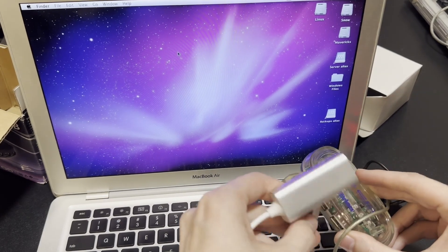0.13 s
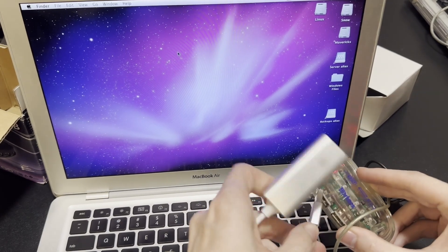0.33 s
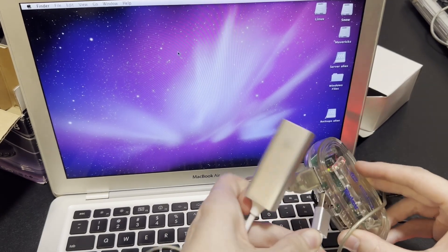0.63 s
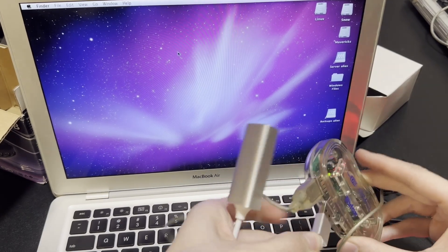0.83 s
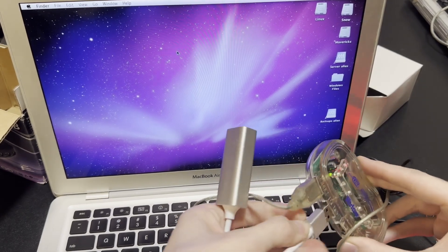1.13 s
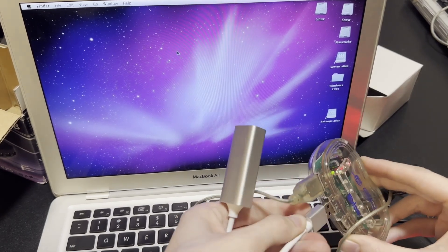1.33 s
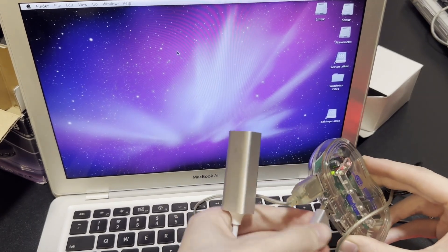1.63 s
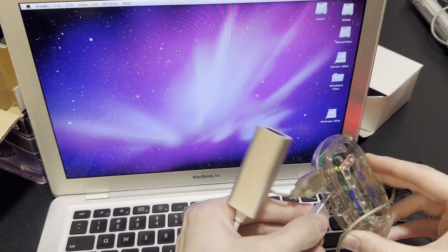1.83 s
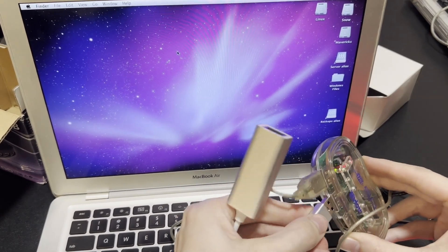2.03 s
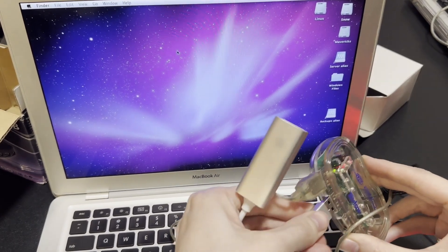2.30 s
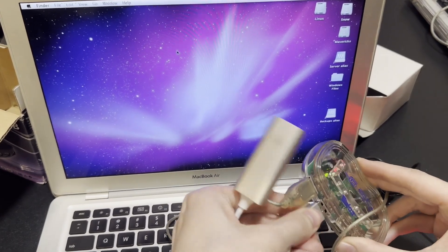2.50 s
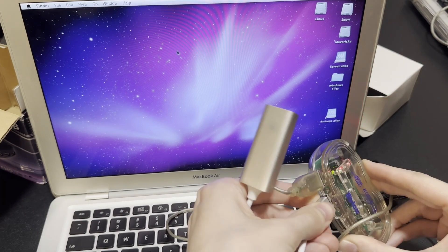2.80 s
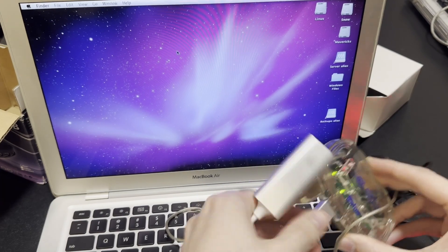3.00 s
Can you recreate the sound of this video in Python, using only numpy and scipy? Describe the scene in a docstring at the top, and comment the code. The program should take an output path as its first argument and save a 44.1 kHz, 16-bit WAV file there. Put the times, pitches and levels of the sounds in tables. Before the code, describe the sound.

Sharp bouncing taps of a metal adapter on a hollow plastic hub, then small clustered plug clicks with faint ticks and sliding, close stereo microphone in a small room with low rumble.

```python
"""A small room with a low rumble, a faint hum and hiss; a hollow plastic hub is close to the stereo microphone.
A metal USB adapter is fitted to its port: the case taps the hub and bounces, then the plug catches several times.
Each contact is a noise-like force that excites the hub's damped modes; thin metal adds decaying sines.
Between them the parts tick, and slide with grainy filtered noise. The hub thuds softly in the hand.
The room answers the knocks with decaying noise, coloured and timed band by band."""
import sys
import numpy as np
from scipy import signal
from scipy.fft import rfft, irfft
from scipy.io import wavfile
from scipy.ndimage import uniform_filter1d

SR = 44100
rng = np.random.default_rng(int(sys.argv[2]) if len(sys.argv) > 2 else 0)


def master(y):
    """Save y as 16-bit WAV."""
    cut = np.clip(np.atleast_2d(y).T, -1, 1)
    pcm = np.round(cut * 32767)  # scale
    wavfile.write(sys.argv[1], SR, pcm.astype(np.int16))


N = 138915

# Edges of six adjoining bands, in order body, shell, clack, snap, edge, sizzle: f/Hz
BAND_EDGES_HZ = [300, 1450, 2200, 3200, 7000, 10600, 16500]
# Placing and distance of each band: delay/s, side level re mid/dB, left minus right/dB,
# room level re knock/dB, room t60/s
BAND_PLACING = [(0.0013, -9, -0.5, -10, 0.47), (0.00061, -6, -5, -9, 0.41), (0.0011, -11, 0, -11.5, .42),
                (0.0019, -1, 3, -10.5, 0.41), (0.00054, 1, 2, -16.5, 0.41), (0.0013, -7.5, -0.5, -17, 0.32)]

# Room rumble, spectral shape: f/Hz, relative level per Hz/dB
RUMBLE_COLOUR = [(22, -25.5), (36, -3), (55, 1), (75, -1), (100, -2), (130, -5.5), (180, -11.5), (230, -10),
                 (300, -18), (450, -24.5), (700, -30), (1200, -34), (1500, -39), (1900, -37.5), (3000, -46),
                 (6000, -52)]
# Microphone hiss, spectral shape: f/Hz, relative level per Hz/dB
HISS_COLOUR = [(300, 7.5), (1200, 6.5), (2500, -6.5), (4000, -5.5), (5700, -7.5), (6700, 7.5), (7600, 5),
               (8500, -11.5), (9750, -8.5), (10100, -0.5), (10450, -17.5), (13000, -17), (16000, -19.5)]
RUMBLE_DB, RUMBLE_SIDE_DB = -57.5, -15  # rms level, side level re mid
HISS_DB, HISS_SIDE_DB = -70, 0.5
HUM_HZ, HUM_DB = 99.3, -68

# Soft thuds of the hub in the hand: t/s, f/Hz, peak level/dB, swell/s
THUDS = [(.031, 230.4, -49, .003), (1.535, 153.5, -57.5, 0.019), (1.545, 219.6, -57.5, 0.01),
         (2.605, 155, -45, .006), (2.607, 372, -47, 0.005)]

# Adapter's case bouncing on the hub: t/s, contact length/s, level in each of the six bands/dB
CASE_TAPS = [(0.032, 0.00096, -43.5, -44, -33, -27, -23, -28),
             (0.0514, 0.0012, -47, -50, -42, -32.5, -34.5, -31.5),
             (0.0836, 0.0021, -47.5, -37.5, -41, -42.5, -39, -44.5)]
# Catches of the plug: t/s, scrape length/s, favoured hub resonance f/Hz, sleeve ring level/dB,
# level in each of the six bands/dB
PLUG_CATCHES = [(0.9538, 0.0044, 956, -10, -53, -45, -45.5, -54, -43.5, -59.5),
                (0.9603, 0.00073, 951, -4, -54.5, -42.5, -38, -45, -34.5, -43.5),
                (0.964, 0.002, 781, 1, -37, -42, -46.5, -37.5, -36.5, -44.5),
                (0.9688, 0.002, 720, -4, -39.5, -44, -47.5, -44, -46, -51),
                (1.453, 0.0014, 1090, -11.5, -43, -41, -50.5, -50, -52, -54),
                (1.8958, 0.0014, 478.5, -14, -40, -34.5, -36.5, -38, -33, -48),
                (2.0828, 0.0022, 1080, 0.5, -37.5, -45, -42, -46, -39, -40.5),
                (2.0865, 0.0027, 601, 3, -45.5, -47.5, -48, -40, -44.5, -48.5),
                (2.6055, 0.0014, 1099, -14, -47.5, -42.5, -50, -53.5, -48.5, -50),
                (2.608, 0.002, 1150, -14, -40.5, -43, -50.5, -50, -51, -55.5),
                (2.6128, 0.0017, 380, -14, -53.5, -54, -57.5, -54, -54.5, -52.5)]
# Light touches of the parts: t/s, level in each of the six bands before TICK_DB/dB
TICKS = [(0.1407, -54, -53.5, -52.5, -80, -62, -67), (0.2307, -53, -53, -60, -63, -62, -64.5),
         (0.3604, -51.5, -54, -57, -65, -84, -77), (0.6545, -54.5, -62.5, -60, -62, -51.5, -58),
         (0.767, -69, -60.5, -77, -71, -80, -82.5), (0.783, -70, -72, -71, -60, -67, -78),
         (0.8823, -59, -75, -79.5, -58.5, -58, -75), (1.0857, -69, -61, -73.5, -72, -78, -83.5),
         (1.1082, -68, -72, -83, -66.5, -62.5, -69), (1.1924, -78, -65.5, -81.5, -74.5, -79, -93),
         (1.3121, -80, -85, -79, -65.5, -81.5, -92.5), (1.3378, -65.5, -71, -68, -58.5, -82, -100.5),
         (1.3495, -70, -72, -70, -59.5, -69.5, -85), (1.4102, -61.5, -58.5, -72, -71, -70, -80),
         (1.4253, -59.5, -59.5, -70, -70, -83, -88), (1.6944, -61, -64.5, -66.5, -85, -67.5, -78.5),
         (1.955, -58, -58, -57, -57.5, -84, -67), (2.2681, -74.5, -83, -67.5, -60.5, -59, -64.5),
         (2.451, -90, -95, -91.5, -79, -66.5, -58.5), (2.5034, -62.5, -65.5, -70, -68.5, -61.5, -66),
         (2.5476, -75, -71, -84, -63, -61, -75), (2.5596, -78, -57, -64.5, -72, -75, -76),
         (2.8245, -81.5, -95, -94.5, -72.5, -79, -78), (3.0511, -61.5, -70, -76, -64.5, -65, -64)]
TICK_DB, TICK_LENGTH_S = -2, .0007
# Damped modes of the hub: f/Hz, relative level before the favoured spot/dB, t60/s
HUB_MODES = [(510, -6.5, .016), (727, -5, .02), (921, -4.5, .02), (1062, -1.5, 0.019), (1213, -4, 0.013),
             (1750, 2, 0.015), (1957, 4, 0.022), (2360, -3, .012), (2734, 0.5, 0.011), (3400, -1, .009),
             (4023, 0, 0.005), (4893, 1.5, .012), (5854, -1.5, 0.0082), (6760, 1, 0.009),
             (7420, 0.5, 0.0047), (9170, 6, .005), (10010, 7.5, 0.0063), (11850, -3, .003),
             (14200, -2.5, 0.002)]
# The spot that is struck favours the modes near one pitch; taps and ticks share theirs
LIGHT_KNOCK_HZ, FAVOUR_DB, FAVOUR_OCTAVES = 1050, 6.5, 0.38
LEAD_S = .004  # room for the force to build up before the contact time
SCRAPE_RISE_S, SCRAPE_RELEASE_S = 0.00069, 0.00067  # time constants; the rise lengthens with the scrape
CHATTER_DB, CHATTER_S = -15, 0.0039  # slower tail of the release

# Lasting ring of the adapter's case: f/Hz, level re the blow in that band before RING_DB/dB, t60/s
CASE_MODES = [(2000, -18.5, .3), (2600, -24.5, .3), (2740, -28, .45), (5050, -22.5, 0.4),
              (5180, -24.5, 0.38), (5220, -22, .38), (6700, -25, .37), (6870, -23.5, 0.35),
              (8130, -30, 0.16), (10250, -31, .22), (13020, -16.5, .23)]
# Lasting ring of the plug's sleeve: f/Hz, level re the blow before sleeve ring level and RING_DB/dB, t60/s
SLEEVE_MODES = [(1830, -18, .4), (2020, -30, 0.15), (2870, -27, 0.31), (4800, -20, .28),
                (4500, -24.5, 0.41), (5040, -18, .33)]
RING_DB = 0.5

# Colour of the room's echo: f/Hz, relative level/dB
ROOM_COLOUR = [(300, -0.5), (750, -1), (1100, -2), (1330, 3.5), (1510, 3.5), (1750, 3), (2000, -2.5),
               (2750, -2), (3300, -3), (4200, -4.5), (5000, 0), (6000, -7), (7500, 1.5), (10100, -1.5),
               (11200, -3), (14000, -4), (16000, -11)]
ROOM_ONSET_S, EARLY_DB, EARLY_S = 0.00667, 2, .014

# Fingers and plug sliding on the plastic: t/s, length/s, level in each of the six bands before SLIDE_DB/dB
SLIDES = [(0.267, 0.14, -70, -77, -76, -73.5, -69, -66), (0.504, 0.097, -70, -76, -72, -94, -84.5, -85.5),
          (0.583, 0.14, -63.5, -69.5, -67.5, -77.5, -73.5, -75),
          (0.704, 0.17, -69, -75.5, -71.5, -69, -66.5, -71.5),
          (0.816, 0.17, -67.5, -74, -77, -65.5, -63.5, -66),
          (1.725, 0.13, -69.5, -74, -81, -80, -76.5, -87), (1.792, 0.18, -78, -79, -82, -82, -66, -83),
          (2.295, 0.12, -74, -79.5, -89, -83, -78, -82.5), (2.465, 0.21, -68, -70, -76.5, -72.5, -75, -76),
          (2.625, 0.18, -68, -72, -84.5, -89, -91, -97), (2.905, 0.22, -70.5, -77.5, -80, -78, -79, -80.5),
          (3.006, 0.16, -67, -74.5, -81, -74.5, -76, -73.5)]
# Colour of rubbing: f/Hz, relative level/dB
RUB_COLOUR = [(300, -7), (750, -7.5), (1250, 3), (1510, 2.5), (1800, 11), (2750, -3.5), (3200, -2),
              (5000, -4), (6500, 0), (8500, -1), (9700, -0.5), (10400, 5), (11200, -9.5), (12500, -12),
              (14000, -6), (16000, -13)]
SLIDE_DB, SLIDE_GRAIN, SLIDE_WAVER_DB = -3.5, 0.24, 2.36  # grain is the rms of the log gain

TOP_HZ = 15600


def undb(db):
    """Decibels to gain."""
    return 10 ** (np.asarray(db) / 20)


def unit(x):
    """Scale to an energy of one."""
    return x / np.sqrt(np.sum(x ** 2) + 1e-18)


def level(x, db):
    """Scale to an rms level."""
    return x * undb(db) / np.sqrt(np.mean(x ** 2))


def add(out, x, s):
    """Mix a sound in, starting at s seconds."""
    i = max(int(s * SR), 0)
    out[:, i:i + x.shape[1]] += x[:, :max(N - i, 0)]


def band(x, k):
    """Keep one of the six bands; neighbours cross over without a gap."""
    size = 2 * x.shape[-1]
    f = np.fft.rfftfreq(size, 1 / SR) + 1
    low, high = BAND_EDGES_HZ[k:k + 2]
    gain = 1 / (1 + (low / f) ** 20) / (1 + (f / high) ** 20)
    return irfft(rfft(x, size) * gain, size)[..., :x.shape[-1]]


def noise(colour, size):
    """Two unrelated noises whose spectrum follows (f/Hz, level/dB) points."""
    hz, db = np.array(colour).T
    f = np.maximum(np.fft.rfftfreq(size, 1 / SR), 1)
    gain = undb(np.interp(np.log(f), np.log(hz), db))
    return irfft(rfft(rng.standard_normal((2, size))) * gain, size)


def stereo(pair, side_db, pan_db=0):
    """Mid and side to left and right."""
    sign = np.array([[1], [-1]])
    mid, side = unit(pair[0]), undb(side_db) * unit(pair[1])
    return (mid + side * sign) * undb(pan_db * sign / 2)


def fade(t, t60):
    """Exponential decay by 60 dB in t60."""
    return np.exp(-np.log(1000) * t / t60)


def background():
    """Steady coloured noise for room rumble and microphone hiss, with a faint sine hum."""
    rumble = level(stereo(noise(RUMBLE_COLOUR, N), RUMBLE_SIDE_DB), RUMBLE_DB)
    hiss = level(stereo(noise(HISS_COLOUR, N), HISS_SIDE_DB), HISS_DB)
    hum = level(np.sin(2 * np.pi * HUM_HZ * np.arange(N) / SR), HUM_DB)
    return rumble + hiss + hum


def thuds():
    """The hub gives in the hand: a low sine pulse swells and dies away, dead centre."""
    out = np.zeros((2, N))
    t = np.arange(SR // 5) / SR
    for s, hz, db, swell in THUDS:
        envelope = t / swell * np.exp(1 - t / swell)
        pulse = undb(db) * envelope * np.sin(2 * np.pi * hz * t)
        add(out, pulse[None], s)
    return out


def burst(shape):
    """Two random forces that follow an envelope and have a nearly even spectrum."""
    force = rng.standard_normal((2, len(shape))) * shape
    for _ in range(3):
        # flatten the spectrum, then restore the envelope
        force = irfft(np.exp(1j * np.angle(rfft(force))), len(shape))
        power = np.abs(uniform_filter1d(force ** 2, size=24))
        force = force * shape / np.sqrt(power + 1e-18)
    return force


def contact(length, levels, knock_hz):
    """A short scrape builds up, lets go and chatters, knocking the hub's modes; one stereo sound per band."""
    t = np.arange(2400) / SR
    since = t - LEAD_S
    grip = np.exp(np.minimum(since - length / 2, 0) / (SCRAPE_RISE_S + length / 10))
    after = np.maximum(since - length, 0)
    release = np.exp(-after / SCRAPE_RELEASE_S) + undb(CHATTER_DB) * np.exp(-after / CHATTER_S)
    force = burst(grip * release)
    hub = np.zeros(len(t))
    for hz, db, t60 in HUB_MODES:
        favour = FAVOUR_DB * np.exp(-(np.log2(hz / knock_hz) / FAVOUR_OCTAVES) ** 2)
        hub += undb(db + favour) * fade(t, t60) * np.cos(2 * np.pi * hz * t)
    knock = signal.fftconvolve(force, hub[None])[:, :len(t)]
    sounds = []
    for k, db in enumerate(levels):
        _, side_db, pan_db, *_ = BAND_PLACING[k]
        placed = unit(stereo(band(knock, k), side_db, pan_db))
        # the level is an rms as if the energy filled 10 ms of two channels
        sounds.append(placed * undb(db) * np.sqrt(2 * SR / 100))
    return sounds


def metal(modes, levels):
    """Thin metal rings on as decaying sines, each mode as strongly as the blow in its band."""
    t = np.arange(SR // 2) / SR
    out = np.zeros((2, len(t)))
    for hz, db, t60 in modes:
        blow = levels[np.searchsorted(BAND_EDGES_HZ, hz) - 1]
        # a quarter cycle between left and right widens the ring
        phase = rng.uniform(0, 2 * np.pi) + np.array([[0], [np.pi / 2]])
        detuned_hz = hz * (1 + .003 * rng.standard_normal())
        tone = np.sin(2 * np.pi * detuned_hz * t + phase)
        out += undb(blow + db + RING_DB) * fade(t, t60) * tone
    return out * (1 - np.exp(-t / .002))


def plug():
    """All taps, catches and touches of the parts: the hub's knocks by band, and the metal ring."""
    knocks, ring = np.zeros((len(BAND_PLACING), 2, N)), np.zeros((2, N))
    blows = []
    for s, length, *dbs in CASE_TAPS:
        blows.append((s, length, np.array(dbs), LIGHT_KNOCK_HZ, CASE_MODES, 0))
    for s, length, hz, ring_db, *dbs in PLUG_CATCHES:
        blows.append((s, length, np.array(dbs), hz, SLEEVE_MODES, ring_db))
    for s, *dbs in TICKS:
        blows.append((s, TICK_LENGTH_S, np.array(dbs) + TICK_DB, LIGHT_KNOCK_HZ, None, 0))
    for s, length, levels, hz, modes, ring_db in blows:
        for k, sound in enumerate(contact(length, levels, hz)):
            delay = BAND_PLACING[k][0]
            add(knocks[k], sound, s - LEAD_S + delay)
        if modes:
            add(ring, metal(modes, levels + ring_db), s)
    return knocks, ring


def room(x, k):
    """The room's echo of one band: noise builds up in milliseconds, drops fast at first, then dies away."""
    *_, db, t60 = BAND_PLACING[k]
    t = np.arange(SR * 2 // 3) / SR
    onset = 1 - np.exp(-(t / ROOM_ONSET_S) ** 2)
    decay = fade(t, t60) + undb(EARLY_DB) * np.exp(-t / EARLY_S)
    echo = noise(ROOM_COLOUR, len(t)) * onset * decay
    wet = signal.fftconvolve(x, echo, axes=1)[:, :N]
    return unit(wet) * np.sqrt(np.sum(x ** 2)) * undb(db)


def sliding():
    """Friction as coloured noise, grainy and wavering, that swells and fades with each move of the hand."""
    out = np.zeros((2, N))
    for s, length, *levels in SLIDES:
        n = int(length * SR)
        fast = level(uniform_filter1d(rng.standard_normal(N), size=30), 0)
        slow = level(uniform_filter1d(rng.standard_normal(N), size=700), 0)
        grain = np.exp(SLIDE_GRAIN * fast)[:n]
        waver = undb(SLIDE_WAVER_DB * slow)[:n]
        rub = noise(RUB_COLOUR, n) * grain * waver * signal.windows.tukey(n, .8)
        for k, db in enumerate(levels):
            side_db = BAND_PLACING[k][1]
            add(out, level(stereo(band(rub, k), side_db), db + SLIDE_DB), s)
    return out


def scene():
    """The background and the handled parts; the room answers the knocks alone."""
    knocks, ring = plug()
    parts = sum(x + room(x, k) for k, x in enumerate(knocks))
    return background() + thuds() + parts + ring + sliding()


def record(dry):
    """The recorder cuts the top with a steep low-pass."""
    low_pass = signal.ellip(8, .2, 70, TOP_HZ, fs=SR, output="sos")
    return signal.sosfilt(low_pass, dry)


dry = scene()
out = record(dry)
master(out)
```